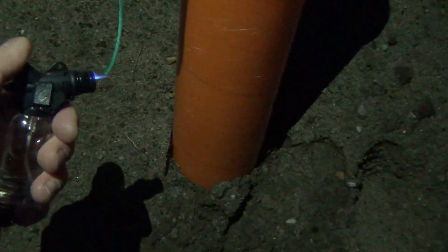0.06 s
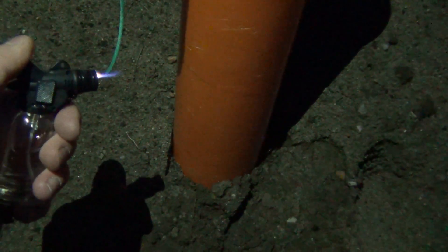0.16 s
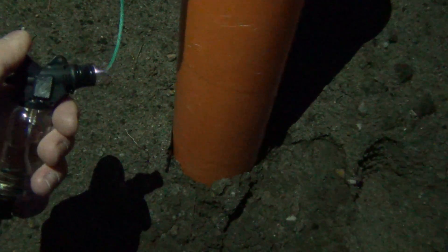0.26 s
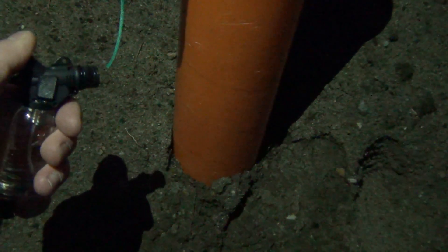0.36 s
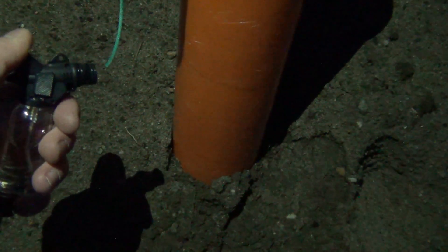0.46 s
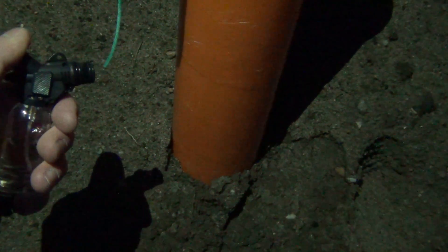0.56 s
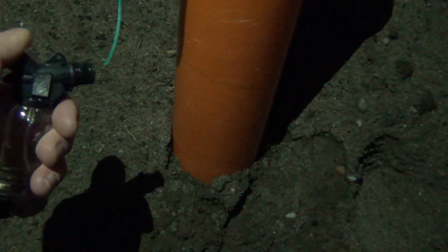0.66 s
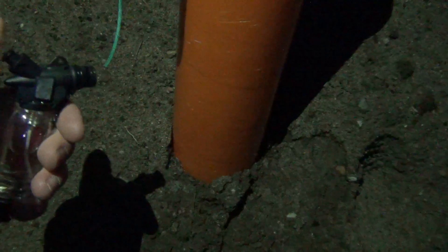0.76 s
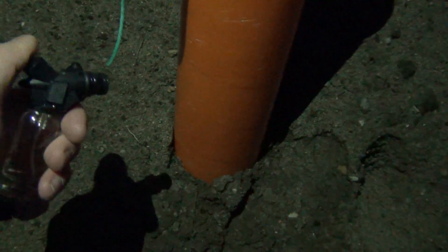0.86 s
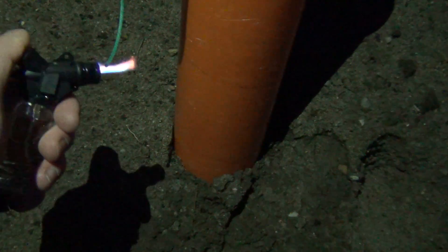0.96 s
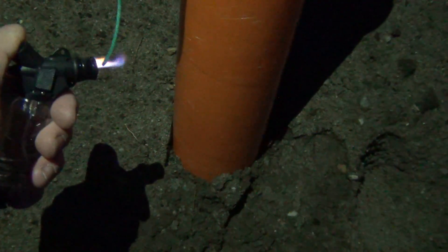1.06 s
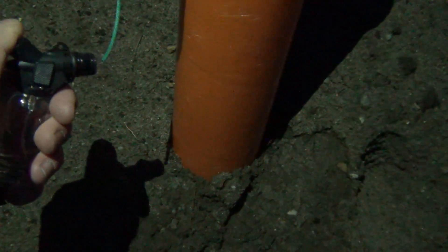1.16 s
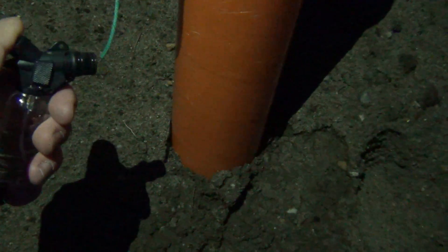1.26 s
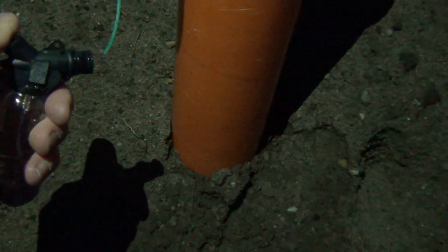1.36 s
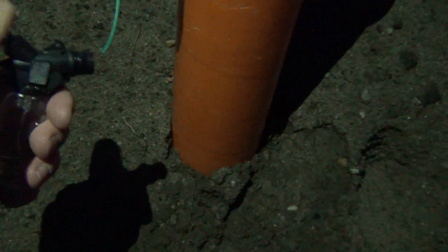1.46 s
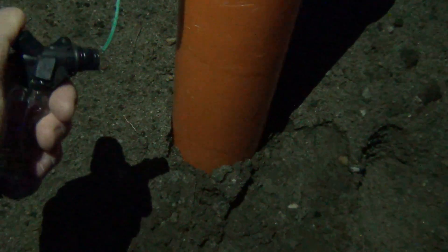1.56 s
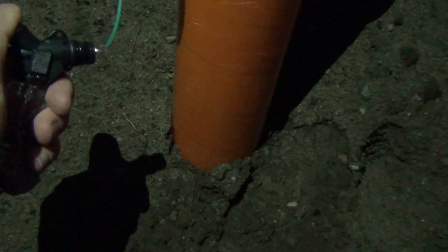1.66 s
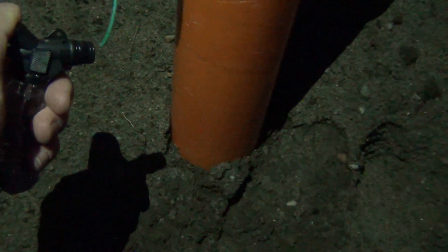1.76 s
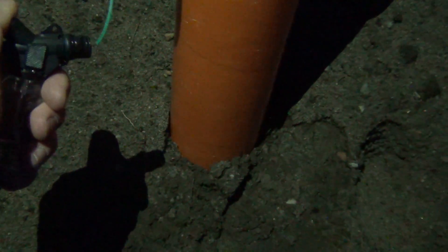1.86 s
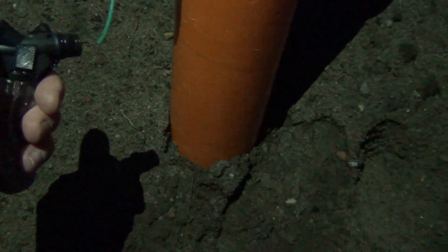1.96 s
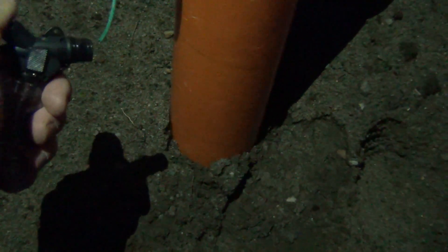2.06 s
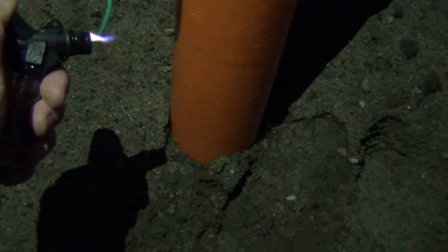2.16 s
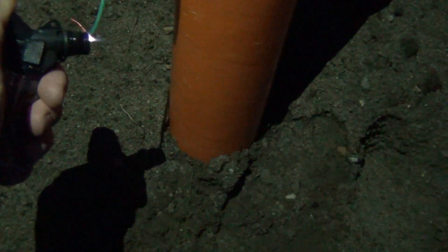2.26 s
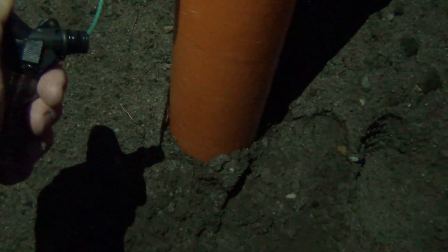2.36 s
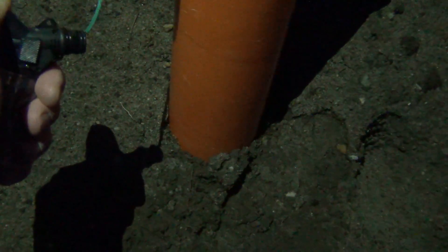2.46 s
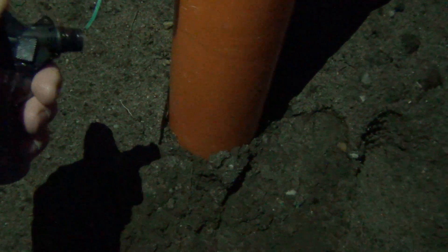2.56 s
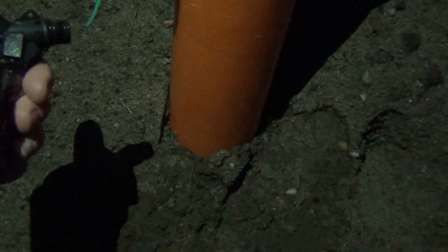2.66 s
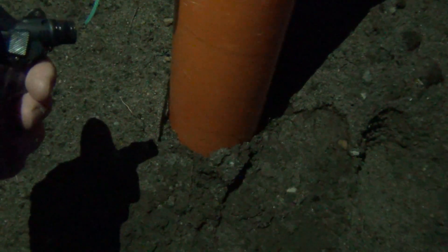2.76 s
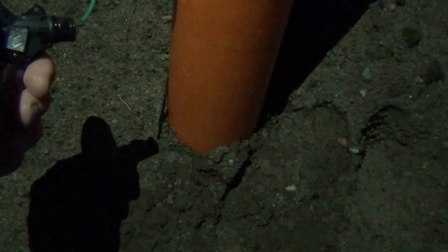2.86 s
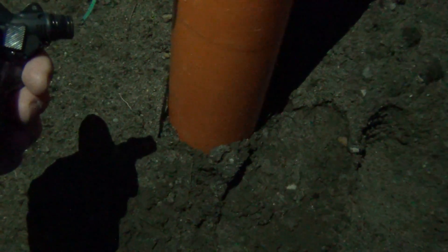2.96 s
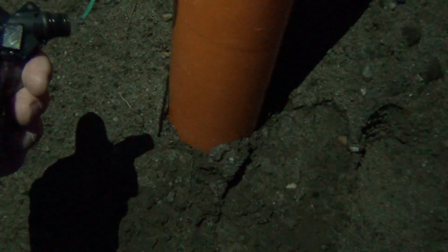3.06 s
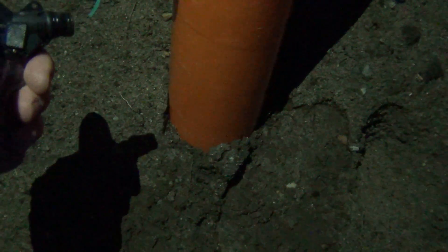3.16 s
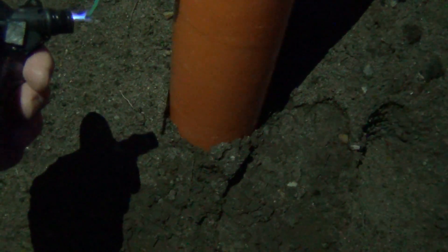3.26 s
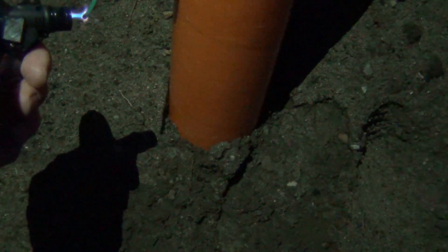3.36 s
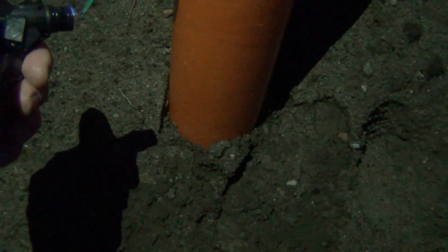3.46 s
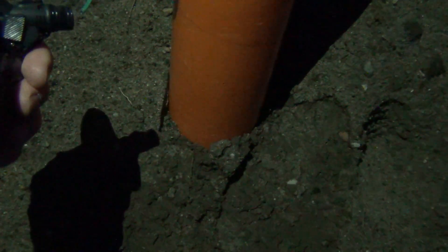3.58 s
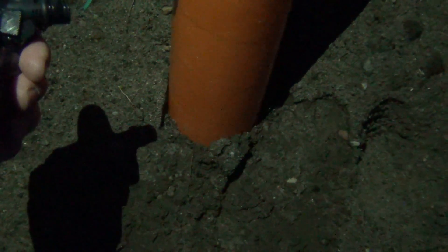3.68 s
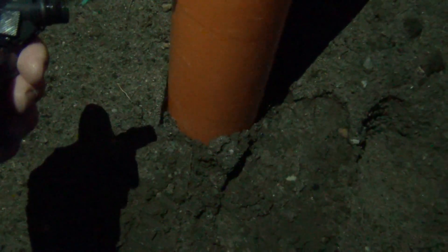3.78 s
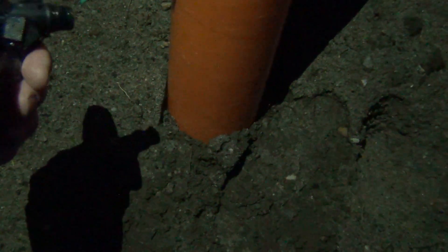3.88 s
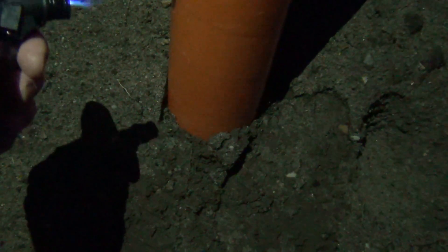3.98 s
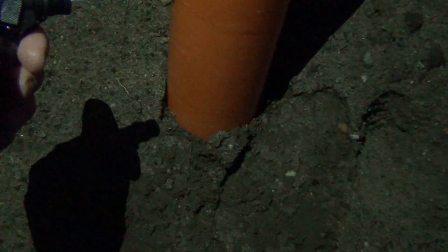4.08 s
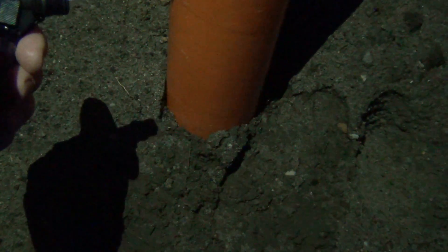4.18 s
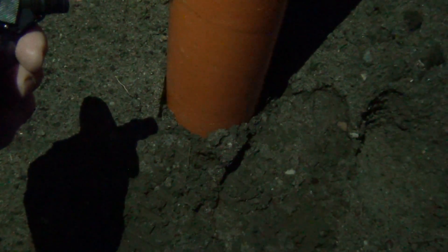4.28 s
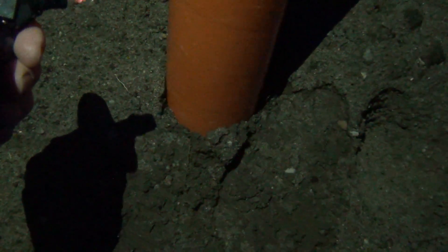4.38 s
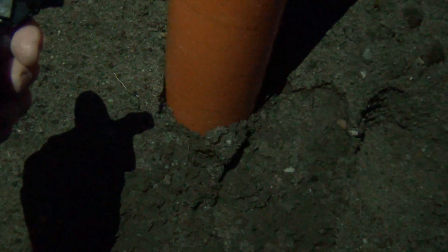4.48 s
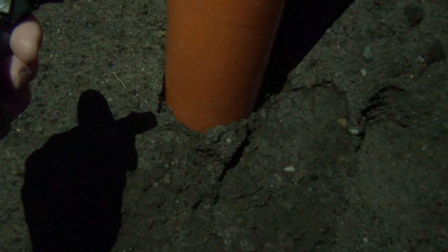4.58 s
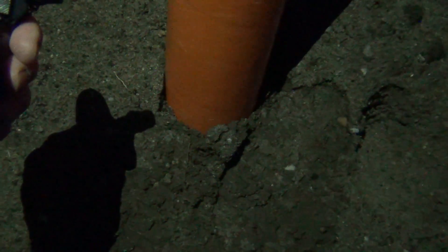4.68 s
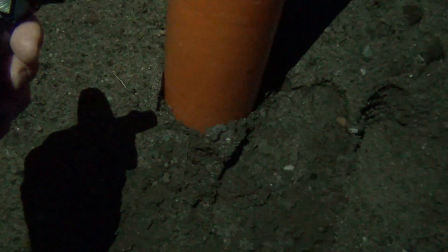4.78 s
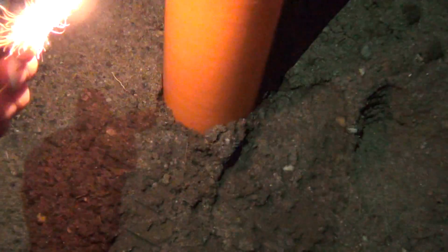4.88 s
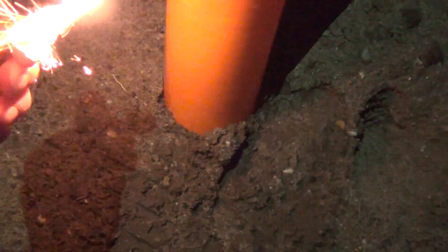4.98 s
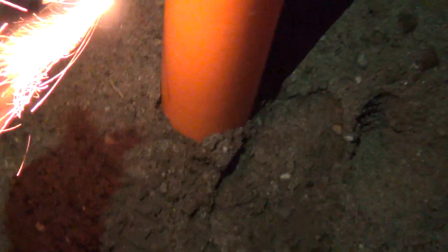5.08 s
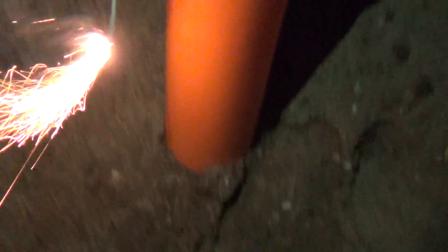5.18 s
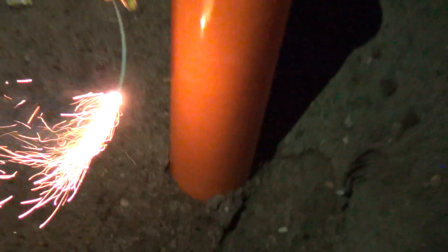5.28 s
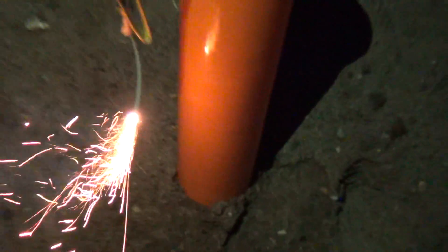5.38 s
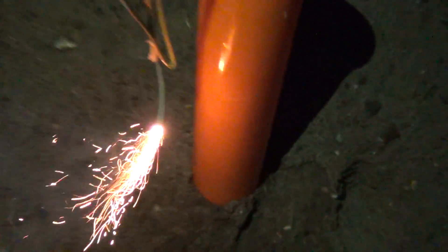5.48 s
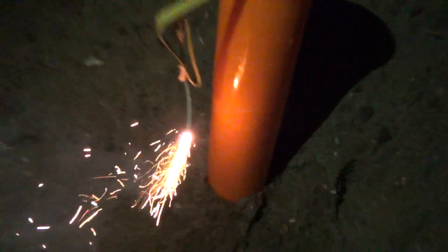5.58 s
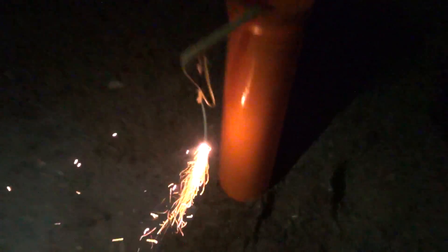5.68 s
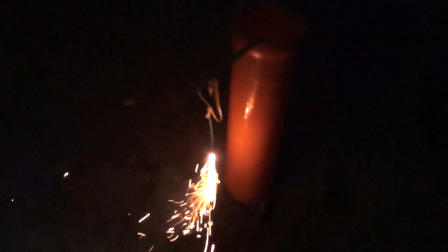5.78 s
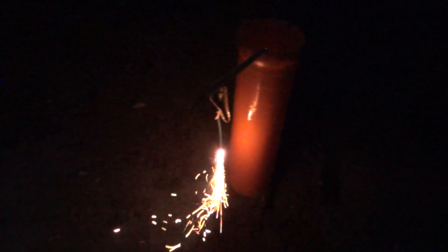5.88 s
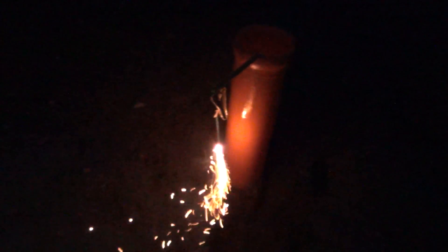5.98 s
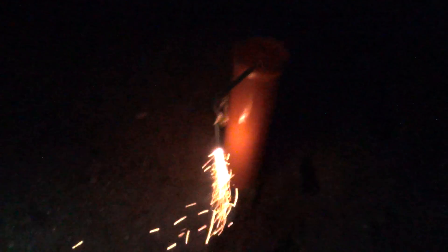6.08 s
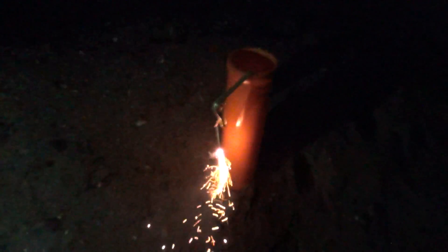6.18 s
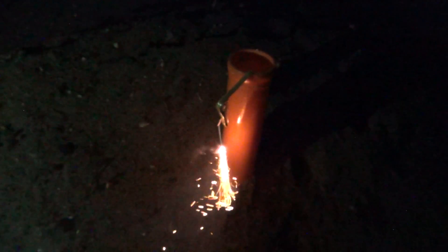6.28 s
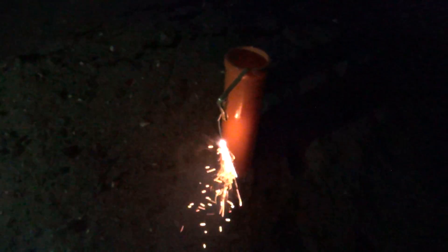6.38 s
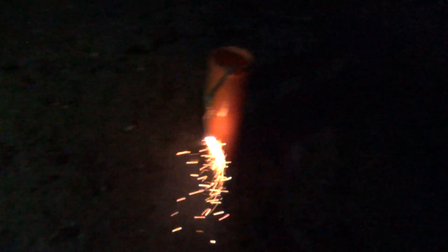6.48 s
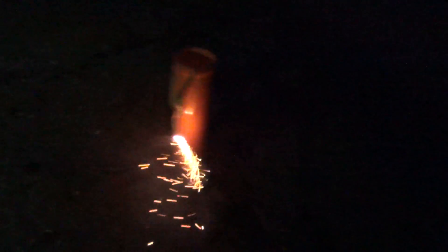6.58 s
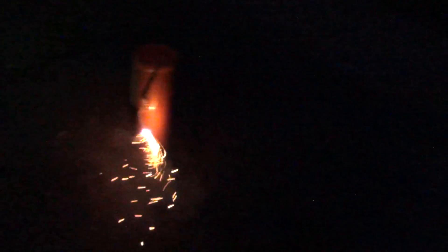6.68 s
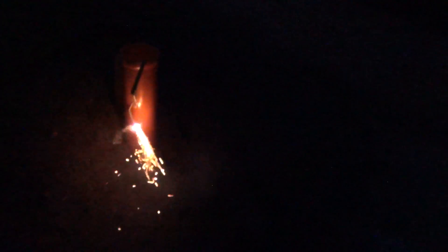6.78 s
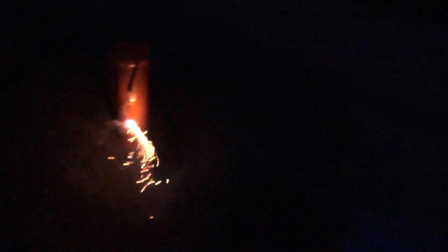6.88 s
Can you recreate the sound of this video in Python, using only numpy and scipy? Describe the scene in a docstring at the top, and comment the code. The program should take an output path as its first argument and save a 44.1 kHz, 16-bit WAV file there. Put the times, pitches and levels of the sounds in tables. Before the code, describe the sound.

A gas lighter clicks six times with short blowing flames, then a firework fuse catches and hisses loudly.

```python
"""Lighting a firework fuse at night

A gas torch lighter is clicked six times at a fuse, close to a hand-held camera. Each press snaps
the piezo hammer, and all but one light a short, blowing flame; each release rattles the trigger back.
The fuse spits, catches and hisses while shoes scuff away over the soil. Wind brushes the microphone,
a far motor drones, and a limiter briefly turns everything down at each loud snap."""
import sys
import numpy as np
from scipy import signal
from scipy.fft import rfft, irfft, next_fast_len
from scipy.io import wavfile
from scipy.ndimage import uniform_filter1d, minimum_filter1d, map_coordinates

SR = 44100
rng = np.random.default_rng(int(sys.argv[2]) if len(sys.argv) > 2 else 0)


def waveform_to_disk(signal):
    """Save audio, clipped to [-1, 1], as 16-bit WAV at the path in sys.argv[1]."""
    frames = np.transpose(np.atleast_2d(signal))
    scaled = np.clip(frames, -1, 1) * 32767
    samples = np.round(scaled).astype(np.int16)
    wavfile.write(sys.argv[1], SR, samples)


N = 306054
TIME = np.arange(N) / SR

# how loud the distant outdoor rush is (time [s], level [dB])
NIGHT_LEVELS = [(0, -42.5), (1.3, -44.5), (3.0, -45), (4.8, -48), (6.94, -33)]
# its tone colour: how strong each pitch is (frequency [Hz], gain [dB])
NIGHT_COLOUR = [(130, -16), (300, -10), (450, -9), (640, -2), (850, -4.5), (1300, -6.5), (1830, -11.5),
                (2500, -13), (3200, -19.5), (4000, -25)]
# bands of the camera's own thin hiss (frequency [Hz], width [Hz], gain [dB])
HISS_BANDS = [(4970, 610, -3), (6630, 470, 1), (7460, 550, 4.5), (8750, 790, -7), (9770, 800, -1.5),
              (11600, 1000, -6), (14100, 1200, -11.5), (15600, 500, -18)]
# how loud the far hum sounds: it sinks, then swells again with the outdoor rush (time [s], level [dB])
MOTOR_LEVELS = [(.8, -39.5), (1.3, -45), (2.45, -47), (3.0, -56.5), (4.0, -62.5), (4.8, -57.5),
                (6.94, -45.5)]
# the far motor's rumble (frequency [Hz], gain [dB])
MOTOR_COLOUR = [(60, -13), (125, -1), (210, 1), (330, -7), (550, -8.5)]
# its humming tones (frequency [Hz], relative level [dB])
MOTOR_TONES = [(128, -11), (198, -9), (592, -18), (785, -22)]
# gusts on the microphone (start [s], end [s], relative level [dB], rise [s], fall [s])
GUSTS = [(0, 0.683, -34, .01, 0.11), (0.803, 0.866, -34, 0.029, 0.025), (.97, 1.1, -47, .04, .03),
         (5.43, 6.94, -36.5, 0.82, .1)]
# their low rumble (frequency [Hz], gain [dB])
WIND_COLOUR = [(22, -25), (42, -9), (85, 4.5), (130, 2), (200, -3), (300, -10), (520, -11)]
# shoes scuff on dry soil (time [s], relative level [dB], length [s])
SCUFFS = [(6.607, -21.5, 0.03), (6.771, -11, 0.0082), (6.891, -21, 0.046)]
# their dull tone (frequency [Hz], gain [dB])
SCUFF_COLOUR = [(100, -19), (220, -5), (370, 3.5), (700, -7), (1400, -1), (2500, -12)]

# nearest echo of flame and fuse (time [s], lag [ms], strength [share], treble kept [share])
NEAR_ECHO = [(4.85, 1.085, .44, .6), (5.03, 1.035, .42, .2), (5.7, 1.025, .32, 0), (6.0, .99, .34, .6),
             (6.55, .926, .32, .6), (6.94, .878, .5, .9)]
# the stretches when the gas burns
# (start [s], end [s], level [dB], treble relative to that [dB], fading [dB/s])
BURNS = [(0, 0.361, -40, -20, -0.5), (0.979, 1.116, -27, -7.5, 11), (1.623, 1.74, -31, -4.5, 143),
         (2.166, 2.33, -34.5, -20, 55), (3.289, 3.59, -33.5, -1, 42), (4.008, 4.74, -41.5, -5, -1.5)]
# the blowing gas flame (frequency [Hz], gain [dB])
FLAME_COLOUR = [(200, -19), (430, -8), (750, -1.5), (1350, -7), (1900, -4), (2850, -5), (3700, -9.5),
                (5000, -9), (7600, -10), (9000, -13.5), (10500, -68), (13500, -17), (15800, -34)]
# the flame flares where it meets the fuse (time [s], level [dB], length [s])
FLARES = [(.275, -43.5, 0.035), (2.218, -41, 0.018), (3.468, -42, 0.025), (4.355, -41, .13),
          (4.55, -52, 0.16)]
# powder spits as the flame licks the fuse (time [s], relative level [dB], length [s])
SPITS = [(.296, -21, 0.0096), (1.015, -17, 0.0077), (1.044, -15, 0.0076), (1.090, -15, 0.0035),
         (2.261, -20, 0.02), (2.306, -17.5, 0.012), (2.326, -20.5, 0.01), (3.600, -31, 0.03),
         (4.335, -19.5, 0.0081), (4.381, -21.5, 0.027), (4.407, -20.5, 0.044), (4.481, -20, 0.01),
         (4.565, -17.5, 0.0082), (4.624, -31, 0.017), (4.744, -24.5, 0.052), (4.804, -24, 0.0055)]
# the fuse tip puffs before it catches (time [s], relative level [dB], length [s])
PUFFS = [(4.746, -24.5, 0.042), (4.757, -16.5, 0.021)]

# the burning fuse's high hiss (frequency [Hz], gain [dB])
FUSE_COLOUR = [(1500, -69), (2450, -13.5), (2950, -5.5), (3400, -8), (4000, -7.5), (4700, -15), (6000, -9),
               (7000, -2), (7750, 3), (8800, -3.5), (10500, -15.5), (12700, -28), (15800, -32)]
# its lower roar (frequency [Hz], gain [dB])
ROAR_COLOUR = [(150, -27.5), (400, -7), (800, -1.5), (1200, -1.5), (1900, 0.5), (2700, 1.5), (4000, -3.5),
               (5000, -1.5), (6500, -1.5), (9000, -32)]
# the burn falters (time [s], depth [dB], half-width [s])
SPUTTERS = [(5.735, 2, .018), (6.31, 1, .04), (6.57, 1.4, 0.042)]
# where the fuse lies as the camera swings round (time [s], left minus right [dB])
FUSE_PAN = [(5.13, 2.5), (5.65, -.5), (6.45, -0.2), (6.75, 0.7)]

# the tones the lighter's body rings with
# (frequency [Hz], time to fade 60 dB [s], gain for the hammer [dB], gain for the trigger [dB])
BODY_TONES = [(1950, 0.016, -24, -9), (2500, 0.011, -8, -4), (3148, 0.012, 1, -1.5),
              (3330, 0.1, -32, -25.5), (3560, 0.011, -9.5, -13), (4330, 0.008, -8, -21),
              (5070, 0.012, -3.5, -12), (5760, 0.0091, -8, -10), (6430, 0.0071, -3, -3),
              (7160, 0.02, -2.5, -10), (7890, 0.0077, 3, 3), (8700, 0.01, -24, -6.5),
              (9200, 0.0045, -9, -3), (11200, 0.0062, -29, -23), (13300, .008, -38, -31)]
# the piezo hammer snaps (time [s], level [dB])
SNAPS = [(0.9763, 2.5), (1.6197, 0.5), (2.167, 2.5), (2.8464, 5.5), (3.2754, 6), (4.0091, 2)]
# the trigger springs back (time [s], level [dB])
RELEASES = [(0.739, -8.5), (1.4635, -6), (1.9996, -7.5), (2.688, -6), (3.117, -5.5), (3.8548, -5)]
# the trigger settles under the thumb (time [s], level [dB])
TICKS = [(0.679, -26), (0.8416, -19), (1.509, -17.5), (2.057, -21.5), (2.7195, -22), (2.747, -19.5),
         (3.155, -16.5), (3.809, -25), (3.9045, -18.5), (3.943, -23)]

# the two microphone openings are shaded differently (frequency [Hz], left minus right [dB])
MIC_BALANCE = [(200, -5), (550, -3.5), (1100, 0), (3100, -0.44), (4200, 1.5), (5500, 3), (6600, 1.5),
               (7700, 0), (9800, 0.5), (13000, 0)]


def undb(db):
    """Turn decibels into a number to multiply by."""
    return 10 ** (np.asarray(db) / 20)


def unit(x):
    """Scale to an average strength (rms) of 1."""
    return x / np.sqrt(np.mean(x ** 2) + 1e-18)


def since(s):
    """Seconds gone by since time s; 0 before it."""
    return np.maximum(TIME - s, 0)


def ramp(s, length_s):
    """Rise from 0 to 1, starting at time s."""
    return np.minimum(since(s) / length_s, 1)


def curves(rows):
    """Join a table's points into one line through time per column."""
    s, *columns = np.transpose(rows)
    return [np.interp(TIME, s, column) for column in columns]


def shape(x, gain):
    """Turn each frequency up or down by gain(frequency)."""
    size = next_fast_len(len(x) + 1024)
    hz = np.arange(size // 2 + 1) * SR / size + 1e-3
    return irfft(rfft(x, size) * gain(hz), size)[:len(x)]


def colour(x, points):
    """Give x a tone colour (frequency [Hz], gain [dB]), falling 24 dB an octave past its ends; rms 1."""
    hz, db = np.transpose(points)
    octave = np.log2(hz)
    beyond = lambda o: abs(o - np.clip(o, octave[0], octave[-1]))
    return unit(shape(x, lambda f: undb(np.interp(np.log2(f), octave, db) - 24 * beyond(np.log2(f)))))


def noise():
    """Plain white noise."""
    return rng.standard_normal(N)


def wander(rate):
    """Glide to a new random value rate times a second; typical size 1."""
    step = max(int(SR / rate), 1)
    return 1.2 * uniform_filter1d(noise()[np.arange(N) // step], step)


def grains(rate, spread_db):
    """About rate tiny pops a second, a few far larger than the rest."""
    pops = (rng.random(N) < rate / SR) * np.sign(noise())
    return unit(pops * undb(spread_db * np.minimum(rng.exponential(size=N), 5)))


def bursts(rows):
    """A loudness curve of short bursts that rise fast and fall slower."""
    return sum(undb(db) * np.sin(np.pi * np.sqrt(ramp(s, length))) for s, db, length in rows)


def add(track, s, sound):
    """Mix a sound in at time s."""
    start = int(s * SR)
    track[start:start + len(sound)] += sound[:N - start]


def delay(x, ms):
    """Delay by a steady or moving lag."""
    return map_coordinates(x, [np.arange(N) - ms * SR / 1000], order=3)


def pan(x, left_db):
    """Make the left side louder than the right by left_db."""
    return np.array([x * undb(left_db / 2), x * undb(-left_db / 2)])


def widen(x):
    """Send x to left and right with opposite signs, which sounds wide."""
    return np.array([x, -x])


def background(hiss_db=-45.5):
    """A far, slowly wavering rush under the camera's own thin hiss."""
    def hiss_gain(f):
        return np.sqrt(sum(undb(2 * db) / (1 + ((f - hz) / width * 1.36) ** 2) ** 2
                           for hz, width, db in HISS_BANDS))

    rush_db, = curves(NIGHT_LEVELS)
    rush = undb(rush_db + 0.28 * wander(2.1)) * colour(noise(), NIGHT_COLOUR)
    hiss = undb(hiss_db) * unit(shape(noise(), hiss_gain))
    wide_rush = undb(rush_db - 38) * colour(noise(), NIGHT_COLOUR)
    wide_hiss = undb(hiss_db - 20) * unit(shape(noise(), hiss_gain))
    return pan(rush, -0.93) + pan(hiss, 1.1) + widen(wide_rush + wide_hiss)


def motor():
    """A far motor on the right: a dull rumble and faint tones that waver with its speed."""
    level_db, = curves(MOTOR_LEVELS)
    speed = 1 + .009 * wander(25)
    hum = sum(undb(db) * (.7 + .6 * wander(14)) * np.sin(2 * np.pi * np.cumsum(hz * speed) / SR)
              for hz, db in MOTOR_TONES)
    rumble = undb(-1.35) * colour(noise(), MOTOR_COLOUR)
    return pan(undb(level_db) * (rumble + hum), -2.1)


def wind():
    """Low gusts swell, hold and die away; they hit the right microphone opening harder."""
    gust = sum(undb(db) * ramp(start, rise) * np.exp(-since(end) / fall)
               for start, end, db, rise, fall in GUSTS)
    rumble = undb(-4.5 + 0.92 * wander(18)) * colour(noise(), WIND_COLOUR)
    swirls = undb(-23) * colour(noise(), WIND_COLOUR)
    return gust * (pan(rumble, -6.5) + widen(swirls))


def shoes():
    """Shoes backing away scrape dull, gritty scuffs from the soil."""
    grit = colour(grains(rate=3100, spread_db=2.27), SCUFF_COLOUR)
    return pan(undb(-8) * bursts(SCUFFS) * grit, -1.2)


def reflect(x):
    """A near echo boosts some pitches and weakens others; they rise as the camera backs away."""
    treble_from_hz = 5960
    lag_ms, share, treble_kept = curves(NEAR_ECHO)
    echo = delay(x, lag_ms)
    dull = shape(echo, lambda f: 1 / (1 + (f / treble_from_hz) ** 2))
    softened = dull + treble_kept * (echo - dull)
    return (x + share * softened) / np.sqrt(1 + share ** 2)


def flame(rise_s=0.028, fall_s=.012, dulling_db_per_s=22):
    """The gas jet flutters and dulls as it settles; where it licks the fuse, powder spits and puffs."""
    low_level = bursts(FLARES)
    treble_level = undb(-7) * low_level
    for start, end, db, treble_db, fade_db_per_s in BURNS:
        burn = ramp(start, rise_s) * undb(db - fade_db_per_s * since(start))
        burn *= np.exp(-since(end) / fall_s)
        low_level += burn
        treble_level += burn * undb(treble_db - dulling_db_per_s * since(start))
    jet = colour(noise(), FLAME_COLOUR) * undb(1.56 * wander(130))
    low = shape(jet, lambda f: 1 / (1 + (f / 3400) ** 6))
    gas = low_level * unit(low) + treble_level * unit(jet - low)
    breath = colour(noise(), [(200, -5), (700, 7.5), (2800, 0), (4500, -10), (7500, -14), (11000, -22)])
    puffs = undb(-10.5) * bursts(PUFFS) * breath
    crackle = colour(grains(rate=9000, spread_db=3.8), [
        (1500, 2), (3000, -3), (5000, -0.5), (7500, 6.5), (9700, -1), (12000, -11), (15500, -16)])
    spits = undb(-12) * bursts(SPITS) * crackle
    return pan(reflect(gas + puffs + spits), 2.1)


def fuse(catch_s=4.874, warm_up_s=.35, far_from_s=5.96):
    """Gas from burning powder jets out of the fuse in fast uneven surges, thick with sparks."""
    alight = ramp(catch_s, 0.043)
    cold = np.exp(-since(catch_s) / warm_up_s)
    falter_db = sum(depth * np.exp(-((TIME - s) / width) ** 2) for s, depth, width in SPUTTERS)
    # the jet starts weak, takes hold, then fades once the camera is well away
    hiss_db = -17 - 3 * cold - 4 * since(far_from_s) - falter_db
    surge = undb(hiss_db + 0.48 * wander(400) + .5 * wander(60))
    sparks = undb(-11) * grains(rate=2500, spread_db=2.2)
    hiss = colour(noise() + sparks, FUSE_COLOUR)
    # its pitch climbs a little as it warms up
    cold_pitch, hot_pitch = 0.96, 1.012
    pitch = hot_pitch + (cold_pitch - hot_pitch) * cold
    hiss = map_coordinates(hiss, [np.cumsum(pitch)], order=5, mode="wrap")
    core = shape(hiss, lambda f: 1 / (1 + (f / 10200) ** 16))
    sizzle = undb(-13 - 0.5 * since(far_from_s)) * unit(hiss - core)  # the very top fades first
    # the fuse's head roars as it flares up; the cord behind it burns more quietly
    head_db, cord_db, head_burnt_s = -3, -11.5, 5.13
    roar_db = head_db + (cord_db - head_db) * ramp(head_burnt_s, 0.12)
    roar = undb(roar_db) * colour(noise(), ROAR_COLOUR)
    jet = reflect(alight * surge * (core + sizzle + roar))
    # the hand throws back the first hiss as it is pulled away
    hand_share = .4 * (1 - ramp(catch_s, .22))
    jet += hand_share * delay(jet, ms=.44 - .55 * since(catch_s))
    # rough ground scatters a little hiss differently to each side
    scatter = alight * undb(hiss_db - 26) * colour(noise(), FUSE_COLOUR)
    left_db, = curves(FUSE_PAN)
    return pan(jet, left_db) + widen(scatter)


def strike(tone_db, contacts, crack_db, tail_db, push_s, tail_s=0.036, scatter_db=3):
    """A blow makes the lighter ring and crack once for each contact (time [s], level [dB])."""
    t = np.arange(4096) / SR
    fade = lambda seconds: np.exp(-np.log(1000) * t / seconds)  # down 60 dB in that time
    hz, ring_s = np.transpose(BODY_TONES)[:2, :, None]
    detune, strength = rng.standard_normal((2, len(BODY_TONES), 1))
    direction = (-1) ** np.arange(len(BODY_TONES))[:, None]  # neighbouring tones swing opposite ways
    tones = direction * np.sin(2 * np.pi * hz * (1 + 0.01 * detune) * t)
    ring = (undb(tone_db[:, None] + scatter_db * strength) * fade(ring_s) * tones).sum(0)
    rough = colour(rng.standard_normal(len(t)), [
        (1800, -9), (3200, 2), (5000, -6), (7600, 1), (9800, -8), (11500, -16), (15500, -21)])
    crack = rough * (undb(crack_db) * fade(0.0039) + undb(tail_db) * fade(tail_s))
    # plastic gives a little, so the force builds up over a short push
    blow = (ring + crack) * (1 - np.exp(-(t / push_s) ** 2))
    click = np.zeros(len(t))
    for s, db in contacts:
        lag = int(s * SR * rng.uniform(.9, 1.1))
        click[lag:] += undb(db) * blow[:len(t) - lag]
    return click / np.sqrt(np.sum(click ** 2) / (SR * 0.0002))  # equal energy for every blow


def lighter():
    """Hard hammer snaps, rattling trigger returns and small ticks, each with a faint near echo."""
    hammer_db, trigger_db = np.transpose(BODY_TONES)[2:]
    clicks = np.zeros(N)
    for s, db in SNAPS:
        snap = strike(hammer_db, [(0, 0)], crack_db=3, tail_db=-17, push_s=.00012)
        add(clicks, s, undb(db) * snap)
    # the trigger grazes its guide just before it hits the stop and bounces
    bounces = [(0, -17), (.002, -4), (.0028, 0), (.0044, -4)]
    for s, db in RELEASES:
        rattle = strike(trigger_db, bounces, crack_db=4, tail_db=-15, push_s=.0003)
        add(clicks, s - .002, undb(db) * rattle)
    for s, db in TICKS:
        tick = strike(trigger_db, [(0.0016, 0)], crack_db=5, tail_db=-17, push_s=0.00092)
        add(clicks, s, undb(db) * tick)
    echo = undb(-21) * delay(clicks, ms=6.8)
    return pan(clicks + echo, 2.8)


def scene():
    """Add all the sounds together in stereo."""
    return lighter() + flame() + fuse() + shoes() + wind() + motor() + background()


def limit(x, ceiling_db, release_db_per_s):
    """A limiter turns the volume down just ahead of a loud peak, then steadily back up."""
    over_db = np.maximum(20 * np.log10(abs(x).max(0) + 1e-9) - ceiling_db, 0)
    climb_db = release_db_per_s * TIME
    cut_db = np.maximum.accumulate(over_db + climb_db) - climb_db
    return x * uniform_filter1d(minimum_filter1d(undb(-cut_db), size=65), size=65)


def record(dry):
    """The microphone openings colour each side; the camera limits peaks and cuts the highest treble."""
    hz, db = np.transpose(MIC_BALANCE)
    left_db = lambda f: np.interp(np.log(f), np.log(hz), db)
    left = shape(dry[0], lambda f: undb(left_db(f) / 2))
    right = shape(dry[1], lambda f: undb(-left_db(f) / 2))
    limited = limit(np.array([left, right]), ceiling_db=-3.5, release_db_per_s=175)
    treble_cut = signal.ellip(12, .2, 80, 15750, fs=SR, output="sos")
    return signal.sosfilt(treble_cut, limited)


dry = scene()
out = record(dry)
waveform_to_disk(out)
```